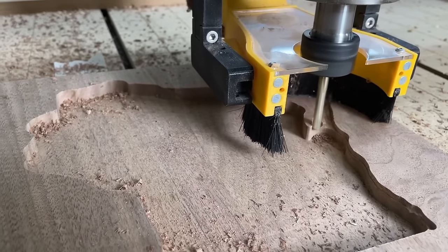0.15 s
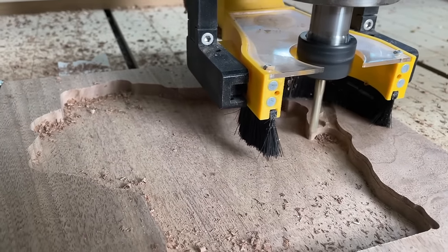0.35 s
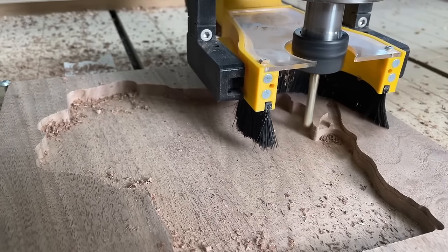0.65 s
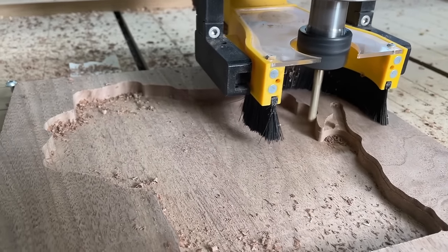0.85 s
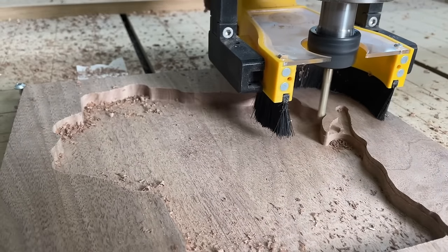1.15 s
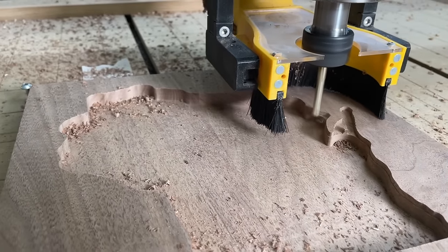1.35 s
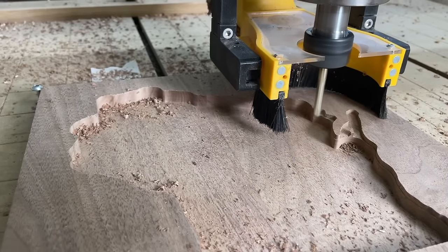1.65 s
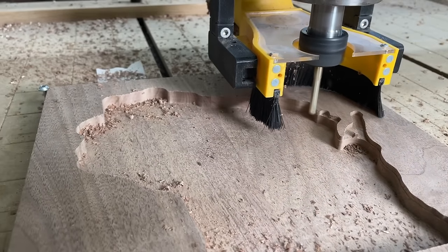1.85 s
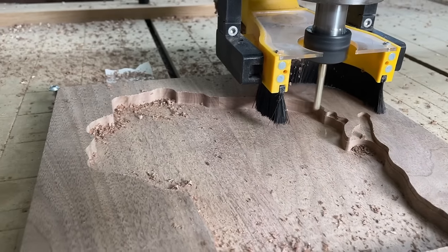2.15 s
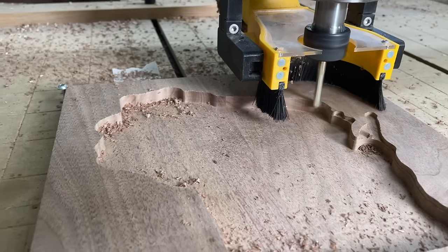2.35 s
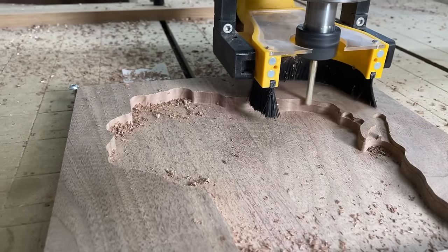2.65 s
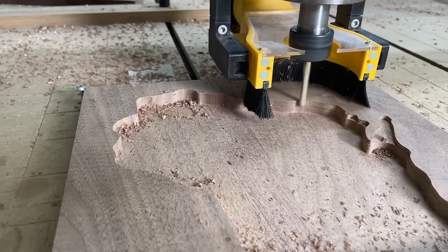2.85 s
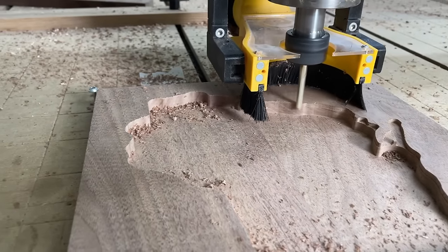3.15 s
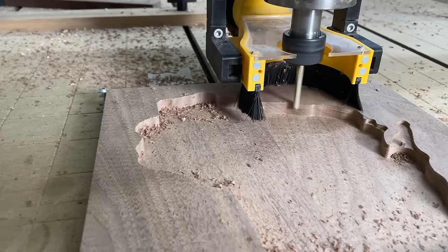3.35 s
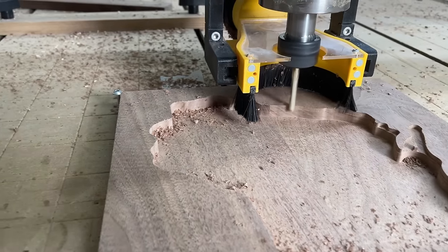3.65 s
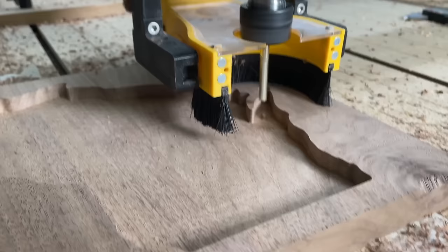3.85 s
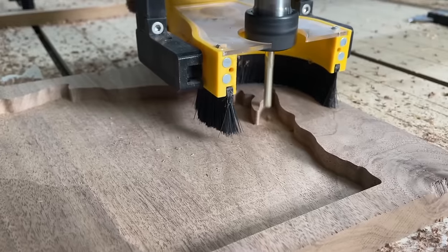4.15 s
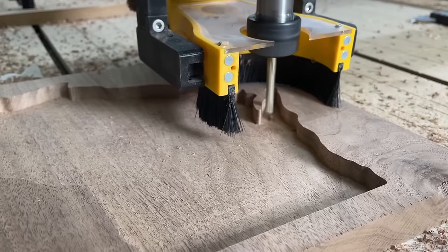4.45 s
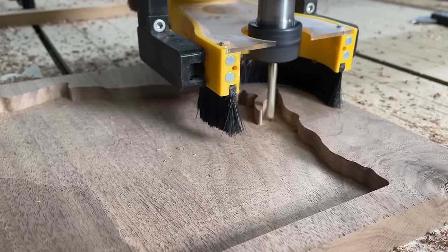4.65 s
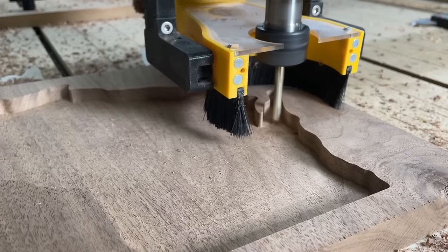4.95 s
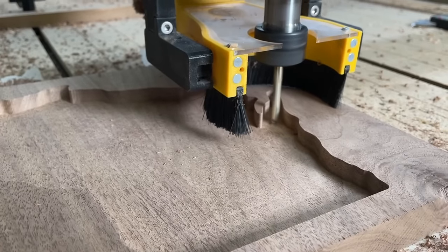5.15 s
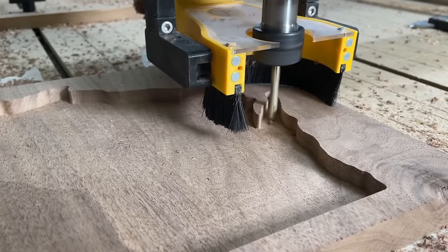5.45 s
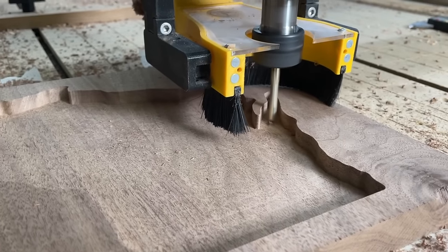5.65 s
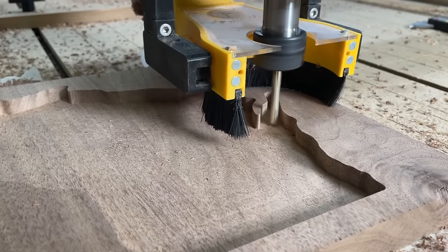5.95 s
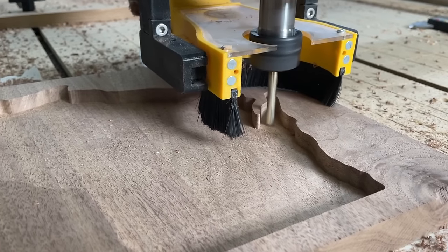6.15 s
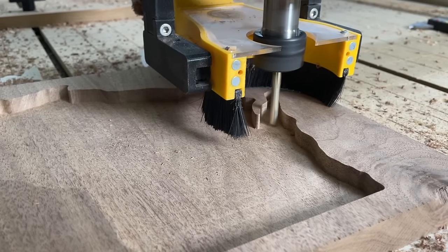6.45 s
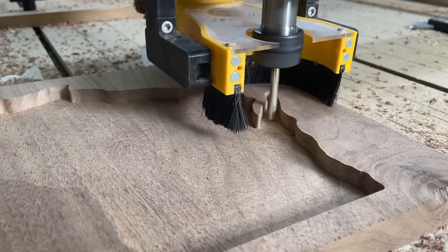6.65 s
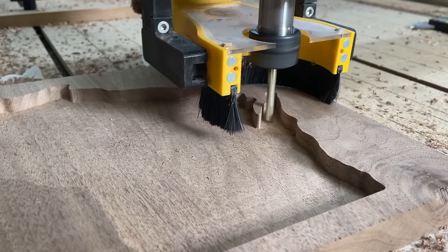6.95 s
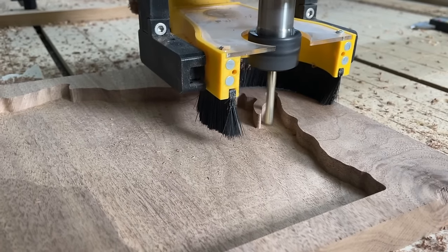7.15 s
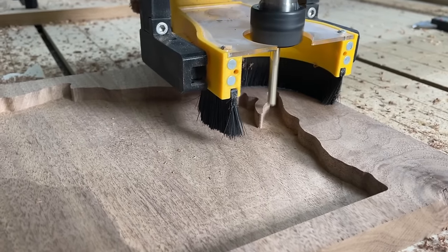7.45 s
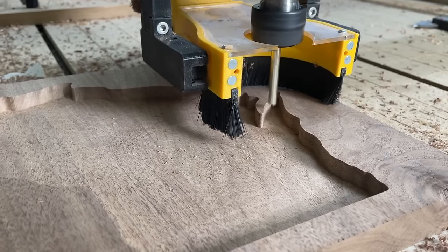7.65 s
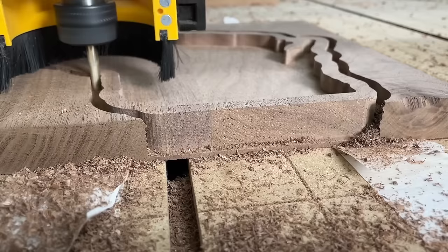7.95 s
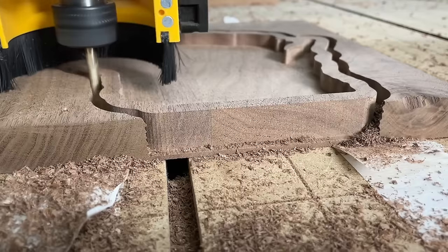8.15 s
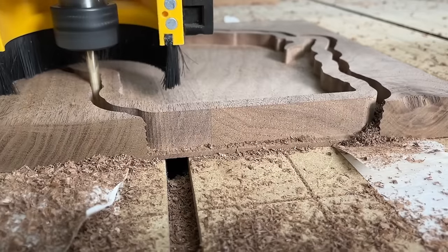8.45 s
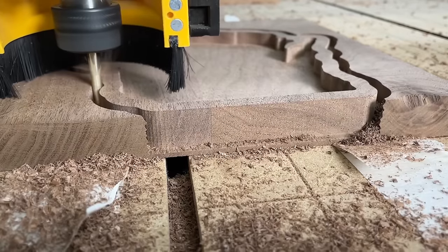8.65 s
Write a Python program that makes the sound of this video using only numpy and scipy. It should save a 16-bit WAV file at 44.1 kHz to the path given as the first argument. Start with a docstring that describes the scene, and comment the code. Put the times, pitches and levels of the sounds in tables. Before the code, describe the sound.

Close in a workshop, a computer-guided router cuts a wooden board. Over a steady spindle hum and airy whine, the bit gives short piercing squeals and crisp chip noise, merging into a longer shrill pass. A hard cut brings much louder rushing cooling air, low hum and light buzzing with tiny chirps. A breathy whistle grows, then another cut returns to quieter air and rough, intensifying squeals. Stereo, three microphone positions.

```python
"""In a workshop a CNC router mills a wooden board, heard from three spots joined by hard cuts.
The spindle hums, its drive sings thinly and the cooling air rushes and whines: harmonics, steady tones, coloured noise.
At the first and last spots the two-flute bit bites: a squeal with sidebands, and gated noise for the torn chips.
At the middle spot it only grazes the wall, with a buzz, ringing and chirps; the air takes over and a whistle grows."""
import sys
import numpy as np
from scipy import signal
from scipy.fft import rfft, irfft, next_fast_len
from scipy.io import wavfile

SR = 44100
rng = np.random.default_rng(int(sys.argv[2]) if len(sys.argv) > 2 else 0)


def wav_record(signal):
    """Record a signal, one row per channel, as 16-bit PCM in the file named by sys.argv[1]."""
    frames = np.transpose(np.atleast_2d(signal))
    bounded = np.clip(frames, -1, 1)
    # unit amplitude maps onto the largest positive 16-bit level
    quanta = np.round(bounded * 32767).astype(np.int16)
    wavfile.write(sys.argv[1], SR, quanta)


N = 388080


def from_db(db):
    """Amplitude of a level in dB."""
    return 10 ** (np.asarray(db) / 20)


def in_time(rows, t):
    """The columns of a curve at the times t."""
    seconds, *columns = np.transpose(rows)
    return [np.interp(t, seconds, column) for column in columns]


def at_hz(rows, hz, column=0):
    """One column of a spectrum, joined on a log-frequency axis."""
    rows = np.array(rows)
    return np.interp(np.log(np.maximum(hz, 1)), np.log(rows[:, 0]), rows[:, 1 + column])


def drift(t, rate_hz):
    """Random wander of spread 1, made of noise mostly below rate_hz."""
    size = next_fast_len(len(t))
    hz = np.fft.rfftfreq(size, 1 / SR)
    lowpass = 1 / (1 + (hz / rate_hz) ** 4)
    slow = irfft(rfft(rng.standard_normal(size)) * lowpass, size)[:len(t)]
    return slow / slow.std()


def angle(hz):
    """Running phase in radians of a changing frequency."""
    return 2 * np.pi * np.cumsum(hz) / SR


def bump(t, peak_s, length_s):
    """A smooth rise and fall of power around one moment."""
    return np.exp(-(2 * (t - peak_s) / length_s) ** 2)


# How alike the two microphones hear. Each row: frequency in Hz, then the left-right correlation
# at the first, middle and last spot (held within -1 to 1 in use).
LIKENESS = [(210, 0.95, 1, 0.98), (467, 0.48, 0.72, 0.66), (835, 0.7, 0.4, 0.89), (2390, 0.75, 0.86, -0.08),
            (2900, 0.46, 0.32, -0.55), (3460, 0.47, -0.24, 1), (4220, 0.68, 0.025, 0.097),
            (6390, 0.5, 0.05, 0.93), (7446, -0.95, -1.89, -0.99), (8777, -1.155, -0.49, -0.99),
            (10380, 1, 1, 0.88), (12500, 1, 0.83, 1), (13500, -0.88, -0.89, -0.87)]
# Stereo balance. Each row: frequency in Hz, then left minus right in dB at the first, middle and last spot.
BALANCE = [(200, -1.5, 2, -1), (476, 0, 2, 2.5), (880, 1, 5, 1.5), (2310, -0.5, 5.5, -0.5),
           (2770, 3, -3, 0.5), (3280, 1.5, -3.5, -2), (4150, 2.5, 3.5, 1), (5440, 0, -2, 1),
           (7550, 0.5, 0, 0.5)]


def microphones(hz, spot):
    """Left-right correlation and the gain of each side at a frequency."""
    gains = from_db(np.array([[.5], [-.5]]) * at_hz(BALANCE, hz, spot))
    return np.clip(at_hz(LIKENESS, hz, spot), -1, 1), gains


def tone(phase, hz, spot):
    """A stereo sine, rms 1 before the balance; its phase leads on the left, or on the right at the middle spot."""
    alike, gains = microphones(hz, spot)
    lead = np.arccos(alike) * (-1) ** spot * np.array([[.5], [-.5]])
    return np.sqrt(2) * gains * np.sin(phase + lead + rng.uniform(0, 2 * np.pi))


def rush(t, colour, spot, gate=1):
    """Stereo noise, chopped by a gate and then coloured; colour(hz) is its amplitude per root Hz."""
    size = next_fast_len(len(t))
    hz = np.fft.rfftfreq(size, 1 / SR)
    alike, gains = microphones(hz, spot)
    mid, side = rfft(rng.standard_normal((2, len(t))) * gate, size)
    pair = np.sqrt(1 + alike) * mid + np.sqrt(1 - alike) * side * [[1], [-1]]
    return irfft(pair * gains * colour(hz) * np.sqrt(SR) / 2, size)[:, :len(t)]


# Swell of the cooling air. Each row: time in seconds, flow in dB added to rush and whine.
FLOW = [(0, -1.5), (1, 1), (3.75, 1.5), (3.76, -1.5), (4.4, -2), (5.5, -0.64), (6.6, 0.7), (7.5, 2.5),
        (7.93, 2.5), (7.94, 1), (8.8, 3)]
# Rush of the air before that swell. Each row: frequency in Hz, dB per Hz at the first, middle and last spot.
AIR = [(25, -101.5, -91, -106.4), (49.7, -87.5, -74.5, -99), (81.4, -77.5, -60.5, -82),
       (144, -77, -61, -84.5), (637, -84.5, -68.5, -89), (695, -88.5, -72.5, -89), (1646, -89, -71.5, -94),
       (1850, -94, -77.5, -96.5), (3200, -93.5, -79.5, -90), (4200, -99.5, -78, -101),
       (4510, -103.8, -86, -98), (9570, -103.5, -87, -97.5), (14600, -107.4, -98, -110.0),
       (15900, -107.0, -85, -104.4)]
# Peaks and dips of the rush close to the spindle, at the middle spot only.
# Each row: centre in Hz, width in Hz, height in dB.
AIR_COLOUR = [(416, 2.9, 10), (1148, 64, -8), (2516, 250, -3.5), (3580, 220, -5.5)]
FAN_HZ = 474.8
# The fan's whine before the swell. Each row: multiple of the fan pitch, dB at the first, middle and last spot.
FAN = [(1, -45.5, -31.5, -52), (2, -62, -43.5, -67)]


def cooling_air(t, spot):
    """The fan's whine, two unsteady harmonics, and the rush of its air swell together."""
    def colour(hz):
        colour_db = at_hz(AIR, hz, spot)
        if spot == 1:
            colour_db = colour_db + sum(db / (1 + (2 * (hz - centre) / width) ** 4)
                                        for centre, width, db in AIR_COLOUR)
        return from_db(colour_db)

    flow_db, = in_time(FLOW, t)
    blade = angle(FAN_HZ + 0.11 * drift(t, 31))
    whine = 0
    for multiple, *db in FAN:
        level_db = db[spot] + .5 * multiple * drift(t, 45)
        whine = whine + from_db(level_db) * tone(multiple * blade, multiple * FAN_HZ, spot)
    air = rush(t, colour, spot, gate=from_db(1.0 * drift(t, 130)))
    return from_db(flow_db) * (whine + air)


# Turns of the spindle per second at the first, middle and last spot, in Hz.
SPINDLE_HZ = [243.9, 243.9, 242.9]
# Spindle hum running free. Each row: multiple of the spindle speed, dB at the first, middle and last spot.
SPINDLE = [(1, -67.5, -51, -61), (2, -59.5, -51, -53), (3, -73, -82, -87), (4, -66.5, -60, -61),
           (6, -67.5, -56.5, -82), (8, -74.5, -73.5, -82), (16, -78, -58.5, -70)]
# Random waver of the free hum at the first, middle and last spot, as a spread in dB.
HUM_WAVER_DB = [3.2, 3.2, 1.3]
# The side load on the bit makes one harmonic of the hum swell.
# Each row: peak in seconds, length in seconds, multiple of the spindle speed, level in dB.
HUM_SWELLS = [(0.752, 0.12, 2, -47.5), (1.063, 0.12, 2, -45.5), (1.2, .09, 3, -60), (1.41, .1, 3, -60.5),
              (1.423, 0.083, 2, -44.5), (2.24, 0.13, 3, -60), (3.452, 0.43, 4, -57), (3.62, 0.33, 3, -59),
              (5.381, 0.23, 6, -51.5), (5.73, .19, 6, -44.5)]
# Switching tones of the spindle drive, in Hz.
DRIVE_HZ = [5756, 6244, 8290, 11512, 12000]
# Their levels, in the same order. Each row: dB at the first, middle and last spot.
DRIVE_DB = [(-78, -57.5, -89), (-75, -62, -90), (-73, -59, -93), (-88, -73, -86), (-93, -66, -87)]


def spindle(t, turn, spot):
    """Harmonics of the rotation, which swell under load, and the thin switching tones of the drive."""
    hum = 0
    for multiple, *db in SPINDLE:
        free = from_db(db[spot] + HUM_WAVER_DB[spot] * drift(t, 13.0))
        loaded_power = sum(from_db(peak_db) ** 2 * bump(t, peak_s, length_s)
                           for peak_s, length_s, swelling, peak_db in HUM_SWELLS if swelling == multiple)
        level = np.sqrt(free ** 2 + loaded_power)
        hum = hum + level * tone(multiple * turn, multiple * SPINDLE_HZ[spot], spot)
    drive = sum(from_db(db[spot]) * tone(2 * np.pi * hz * t, hz, spot)
                for hz, db in zip(DRIVE_HZ, DRIVE_DB))
    return hum + drive


def flute_strikes(t, turn, depth, runout, grain_db):
    """Two flutes strike each turn, one deeper than the other, and no two chips are alike; rms 1."""
    strikes = np.exp(depth * np.cos(2 * turn) + runout * np.cos(turn))
    gate = strikes * from_db(grain_db * drift(t, 310))
    return gate / np.sqrt(np.mean(gate ** 2))


# The bit bites into the wood. Each row: start in seconds, length in seconds, squeal in dB,
# swell over the bite in dB, chips in dB before the hiss trim, sag of the pitch in Hz,
# then the lower, upper and far upper sideband in dB against the squeal.
BITES = [ (0.0, 0.02, -42.5, -3, -61.5, 36, -17, 3, -7), (0.04, 0.16, -49.5, -12, -76, 35, -25, -10, -24),
         (0.72, 0.15, -47, 0, -77.5, 31, -18, -11, -21), (0.9, 0.024, -51.5, 0, -77, 30, -12, -12, -22),
         (0.999, 0.043, -46.5, 4.5, -65.5, 42, -8, -8, -12),
         (1.08, 0.045, -47.5, 4, -61.5, 47, -6, -3, -17), (1.138, 0.013, -40.5, 6.5, -65, 26, -15, -9, -28),
         (1.18, 0.09, -43, -3.5, -74, 27, -22, -12, -30), (1.36, 0.029, -47, 2, -80, 24, -12, -13, -25),
         (1.425, 0.078, -39.5, 0.5, -62.5, 56, -14, -4.5, -32),
         (1.525, 0.014, -39.5, 2.5, -65.5, 26, -20, -8, -26),
         (1.78, 0.046, -54.5, -3, -83.5, 17, -12, -13, -22),
         (1.935, 0.052, -47, -0.5, -72, 24, -8, -10, -25),
         (2.1, .022, -46.5, 3.5, -70.5, 24, -9, -7, -28.5),
         (2.21, 0.047, -40, 1.5, -70, 28, -10.5, -7.5, -35), (2.291, 0.013, -49, 2, -70, 20, -2, -8.5, -25),
         (2.41, 0.28, -44, 5.5, -72.5, 26, -10, -12, -28), (2.65, 0.25, -44, -3.5, -73, 22, -10, -23, -17),
         (2.905, 0.033, -40.5, 0, -68, 20, -8.5, -23, -17),
         (2.968, 0.018, -44.5, -12.5, -69, 22, -15.5, -14, -15.5),
         (3.09, 0.064, -43.5, 1, -72, 21.4, -11, -19, -18), (3.17, 0.324, -39.5, 5, -72, 22, -9, -12, -15),
         (3.5, 0.28, -38.5, -2, -73, 23, -12.5, -13, -21), (7.94, 0.053, -48, -4, -67, 26, -24, 0, -24),
         (8.02, 0.22, -46, 1, -65, 44, -12, 3, -24), (8.2, 0.072, -41, 1, -65, 38, -22, -4, -15),
         (8.26, 0.094, -43.5, -4, -65, 50, -29, 2, -15), (8.357, .012, -37.5, 2, -66, 21, -23, -9, -21),
         (8.412, .015, -43, 0, -66, 21, -18, 0, -17), (8.44, 0.2, -39, 2, -65.5, 48, -29, -3, -15),
         (8.61, 0.1, -37, 0.5, -64, 38.6, -29.5, -5.5, -9),
         (8.71, 0.14, -36.5, -1, -63.5, 42, -13, -2.5, -9), ]
SQUEAL_ATTACK_DB_PER_S, SQUEAL_RELEASE_DB_PER_S = 341.5, 341.5
CHIPS_ATTACK_DB_PER_S, CHIPS_RELEASE_DB_PER_S = 256, 209
ARCH_DB = 1   # the middle of a bite is this much stronger than its ends
CHIPS_SWELL_SHARE = 0.35   # share of the swell that the chips follow
IDLE_SQUEAL_DB, IDLE_CHIPS_DB = -62.5, -86   # between bites the bit still rubs and rings faintly
IDLE_SIDEBAND_DB = -20   # against the squeal, between bites


def engagement(t):
    """Each bite builds up, holds in a low arch and dies away: squeal and chips dB, sag Hz, three sidebands dB."""
    start, length, squeal_db, swell_db, chips_db, sag_hz, *sideband_dbs = np.transpose(BITES)[:, :, None]
    early = np.maximum(start - t, 0)
    late = np.maximum(t - start - length, 0)
    place = np.clip((t - start) / length, 0, 1) - .5
    arch_db = ARCH_DB * (.5 - (2 * place) ** 2)
    squeal_edge_db = SQUEAL_ATTACK_DB_PER_S * early + SQUEAL_RELEASE_DB_PER_S * late
    chips_edge_db = CHIPS_ATTACK_DB_PER_S * early + CHIPS_RELEASE_DB_PER_S * late
    rings = from_db(squeal_db + arch_db + swell_db * place - squeal_edge_db)
    tears_db = chips_db + arch_db + CHIPS_SWELL_SHARE * swell_db * place - chips_edge_db
    idle = from_db(IDLE_SQUEAL_DB)
    # pitch and sidebands glide towards those of the strongest bite
    share = rings ** 2 / ((rings ** 2).sum(axis=0) + idle ** 2)
    sidebands = [IDLE_SIDEBAND_DB + (share * (db - IDLE_SIDEBAND_DB)).sum(axis=0) for db in sideband_dbs]
    ring_db = 20 * np.log10(np.maximum(rings.max(axis=0), idle))
    return ring_db, np.maximum(tears_db.max(axis=0), IDLE_CHIPS_DB), (share * sag_hz).sum(axis=0), *sidebands


# Weaker partials of the squeal. Each row: multiple of the squeal pitch, plus multiple of the spindle speed,
# then dB against the slap of the bit in short bites, in the long pass (before its growth) and at the last spot.
SQUEAL_PARTIALS = [(1, -4, -30, -21, -20.5), (1, -1, -30, -19.5, -26), (1, 3, -40, -19, -35),
                   (1, 5, -37, -20.5, -31), (1, 6, -25.5, -24, -31), (2, -4, -40, -32, -36),
                   (2, -2, -33.5, -29, -29), (2, 0, -22, -30, -19.5), (2, 2, -27, -23.5, -19),
                   (2, 4, -27.5, -39, -15.5), (3, 0, -32, -37, -24), (3, 2, -23, -38, -23),
                   (3, 4, -28, -31, -29), (4, 0, -32, -41, -32), (4, 2, -27.5, -40, -26)]
SQUEAL_HZ = 2862   # the bending pitch of the unloaded bit
LONG_PASS_S = 2.36   # at the first spot, short bites give way to a long even pass
LONG_PASS_GROWTH = 0.93   # there the overtones grow with the squeal: dB per dB
ORDINARY_SQUEAL_DB = -42   # squeal level at which that growth is nil
GRAIN_DB, GRAIN_HZ = .5, 16   # the grain of the wood makes the squeal waver
JOLT_DB = 76.5   # added to the chip level, gives the jitter of the pitch in dB above 1 Hz
HARD_CHIPS_DB = -61   # chip level of a hard bite
# a hard bite shakes each partial in level and phase, and bends the pitch
SHAKE_DB, SHAKE_RADIANS, LURCH_HZ = 3.2, .55, 9


def squeal(t, turn, spot, squeal_db, chips_db, sag_hz, lower_db, upper_db, far_db):
    """The bit chatters at its bending pitch; each flute pumps the vibration, which spreads it into sidebands."""
    pitch_hz = SQUEAL_HZ - sag_hz
    # a weak squeal does not lock and stays ragged; heavy chips jolt the pitch
    ragged = from_db(.7 * (IDLE_SQUEAL_DB - squeal_db))
    hardness = np.minimum(from_db(chips_db - HARD_CHIPS_DB), 1)
    hard = hardness * (.2 if spot else 1)   # most of all at the first spot
    jitter_hz = (16 * ragged + from_db(chips_db + JOLT_DB)) * drift(t, 47.0)
    lurch_hz = LURCH_HZ * hard * drift(t, 21.6)
    bend = angle(pitch_hz + jitter_hz + lurch_hz)
    grain_db = GRAIN_DB * drift(t, GRAIN_HZ)
    # each: multiple of the squeal pitch, multiple of the spindle speed, dB, share of the shaking
    partials = [(1, 0, squeal_db, .4), (1, -2, squeal_db + lower_db, .7),
                (1, 2, squeal_db + upper_db, .4), (1, 4, squeal_db + far_db, .8)]
    # the weaker partials come from the bit slapping the wood, and grow with the chips it tears off
    slap_db = .85 * chips_db + .15 * squeal_db + (20.5 if spot else 24.5)
    growth_db = LONG_PASS_GROWTH * (squeal_db - ORDINARY_SQUEAL_DB)
    for multiple, offset, short_db, long_db, last_db in SQUEAL_PARTIALS:
        pass_db = long_db + growth_db * (multiple > 1)
        db = last_db if spot else np.where(t < LONG_PASS_S, short_db, pass_db)
        partials.append((multiple, offset, slap_db + db, 1))
    out = 0
    for multiple, offset, level_db, share in partials:
        hz = multiple * pitch_hz.mean() + offset * SPINDLE_HZ[spot]
        # the lowest sidebands throb at the last spot
        throb_db = 4 if spot and offset == -4 else 1.3 * share
        shake_db = (3.9 * ragged + SHAKE_DB * share * hard) * drift(t, 60)
        flutter_db = grain_db + shake_db + throb_db * drift(t, 18)
        shake = SHAKE_RADIANS * share * hard * drift(t, 60)
        out = out + from_db(level_db + flutter_db) * tone(multiple * bend + offset * turn + shake, hz, spot)
    return out


# Colour of the tearing chips before their level in each bite. Each row: frequency in Hz, dB per Hz.
CHIPS = [(200, -28.5), (1000, -26.5), (1800, -26), (2900, -19.5), (3800, -26.5), (4300, -23.5), (4900, -29),
         (6000, -29), (7500, -20.5), (9000, -27), (10500, -33.5), (11800, -27.5), (14000, -31),
         (15200, -74)]


def heavy_cut(t, turn, spot):
    """A full bite: the squeal, and noise chopped by the flutes for the tearing chips."""
    squeal_db, chips_db, *voicing = engagement(t)
    gate = flute_strikes(t, turn, depth=0.43, runout=0.11, grain_db=2.5)
    chips = rush(t, lambda hz: from_db(at_hz(CHIPS, hz)), spot, gate=gate)
    # in the hardest bites more of the work goes into ringing and less into hiss
    hiss_db = chips_db - .2 * np.maximum(chips_db + 68, 0) + (-5 if spot else -1)
    return squeal(t, turn, spot, squeal_db, chips_db, *voicing) + from_db(hiss_db) * chips


# Resonances of the bit under a light touch. Each row: centre in Hz, width in Hz, relative level in dB.
BIT_MODES = [(2890, 21, 0.5), (4380, 110, -3.5), (10200, 3700, 1.5)]
# Buzz of the grazing flutes. Each row: multiple of the flute rate, relative level in dB.
GRAZE_BUZZ = [(3, -3), (4, 1.5), (5, -8), (6, -6), (7, -10), (9, -6), (10, -13), (11, -4.5), (14, -6.5)]
# Light touches on the wall. Each row: peak in seconds, length in seconds, dB added in power to the rubbing.
TOUCHES = [(4.865, 0.2, -55), (5.073, 0.083, -56), (5.778, 0.22, -54.5), (5.98, .06, -52.5),
           (6.137, 0.039, -47.5), (6.223, 0.082, -50), (6.393, 0.029, -49), (6.53, 0.04, -46.5),
           (7.85, 0.4, -54)]
RUB_DB, RUB_BUZZ_DB = -58, -60   # the steady rubbing between touches: its ringing, its buzz


def light_cut(t, turn, spot):
    """Grazing flutes buzz at their own rate and stir the bit's resonances; it chirps, but never locks into a squeal."""
    def modes(hz):
        return np.sqrt(sum(from_db(db) ** 2 * 2 / (np.pi * width) / (1 + (2 * (hz - centre) / width) ** 2)
                           for centre, width, db in BIT_MODES))

    touch_power = sum(from_db(db) ** 2 * bump(t, peak_s, length_s) for peak_s, length_s, db in TOUCHES)
    flute = 2 * turn + 0.08 * drift(t, 45)   # each flute meets the fibres a little early or late
    buzz = 0
    for multiple, db in GRAZE_BUZZ:
        level = from_db(db + 2.5 * drift(t, 27))
        buzz = buzz + level * tone(multiple * flute, 2 * multiple * SPINDLE_HZ[spot], spot)
    gate = flute_strikes(t, turn, depth=0.37, runout=0.1, grain_db=3.5)
    ringing = from_db(-1.5) * rush(t, modes, spot, gate=gate)
    buzz_level = np.sqrt(from_db(RUB_BUZZ_DB) ** 2 + touch_power)
    ringing_level = np.sqrt(from_db(RUB_DB) ** 2 + touch_power)
    return buzz_level * buzz + ringing_level * ringing + chirps(t, spot) + whistle(t, spot)


# A breathy whistle grows at the middle spot as the bit lifts clear.
WHISTLE_HZ, WHISTLE_WIDTH_HZ, WHISTLE_DB = 3900, 160, -47
WHISTLE_PEAK_S, WHISTLE_RISE_S = 8.03, 0.56


def whistle(t, spot):
    """Air rings in one narrow band around the lifted bit."""
    def band(hz):
        return 1 / np.sqrt(WHISTLE_WIDTH_HZ * (1 + (2 * (hz - WHISTLE_HZ) / WHISTLE_WIDTH_HZ) ** 4))

    swell = np.exp(-.5 * ((t - WHISTLE_PEAK_S) / WHISTLE_RISE_S) ** 2)
    return from_db(WHISTLE_DB) * swell * rush(t, band, spot)


# The bit catches for a moment and chirps.
# Each row: peak in seconds, length in seconds, level in dB before a random flutter, mean pitch in Hz.
CHIRPS = [(4.843, .025, -48, 5390), (4.97, .018, -50.5, 5355), (5.044, 0.028, -46, 2900),
          (5.091, .02, -47, 2922), (5.642, 0.016, -47, 2820), (5.798, 0.021, -45, 2930),
          (6.143, 0.029, -41.5, 2890), (6.154, .035, -53, 4370), (6.21, .04, -47.5, 4340),
          (6.217, .045, -44, 2790), (6.23, 0.021, -55, 5370), (6.29, .02, -49.5, 2830),
          (6.53, .03, -46, 4380), (6.533, 0.038, -43, 2928)]


def chirps(t, spot):
    """A catch sets one of the bit's modes ringing for an instant, at an unsteady pitch."""
    waver = angle(16 * drift(t, 47.5))
    out = 0
    for peak_s, length_s, db, hz in CHIRPS:
        envelope = np.sqrt(bump(t, peak_s, length_s))
        out = out + from_db(db) * envelope * tone(2 * np.pi * hz * t + waver, hz, spot)
    return from_db(2.2 * drift(t, 60)) * out


# Times of the two hard cuts between the listening spots, in seconds.
CUTS = [3.753, 7.938]


def scene():
    """The three listening spots, one after the other."""
    parts = []
    cut_samples = [round(seconds * SR) for seconds in CUTS]
    for spot, t in enumerate(np.split(np.arange(N) / SR, cut_samples)):
        wander_hz = [.35, .3, .8][spot] * drift(t, 6.7)
        turn = angle(SPINDLE_HZ[spot] + wander_hz)
        cut = light_cut if spot == 1 else heavy_cut
        parts.append(cooling_air(t, spot) + spindle(t, turn, spot) + cut(t, turn, spot))
    return np.hstack(parts)


def record(dry):
    """A steep elliptic low-pass cuts the top."""
    lowpass = signal.ellip(12, .1, 80, 15780, fs=SR, output="sos")   # ripple dB, rejection dB, cutoff Hz
    return signal.sosfilt(lowpass, dry)


dry = scene()
out = record(dry)
wav_record(out)
```